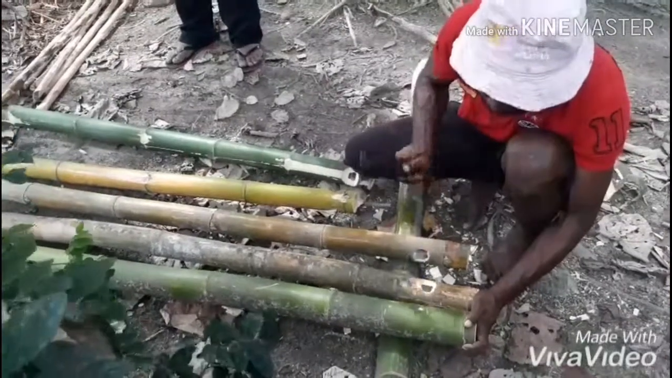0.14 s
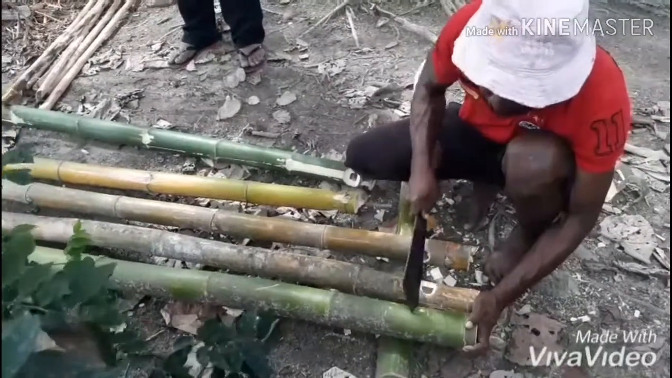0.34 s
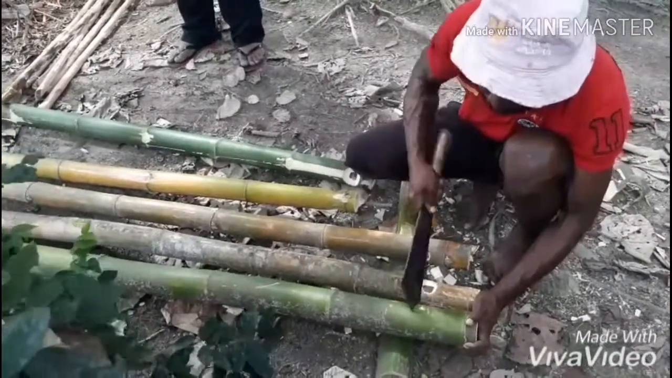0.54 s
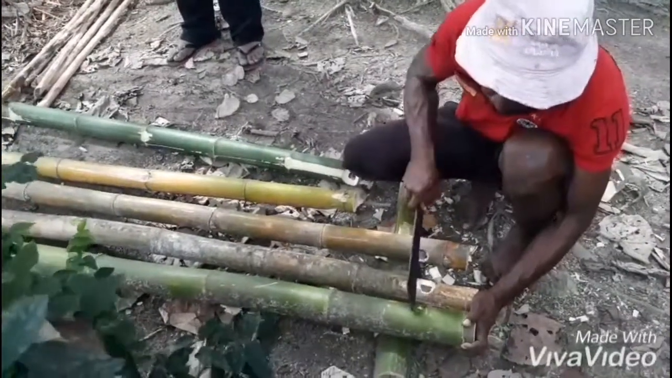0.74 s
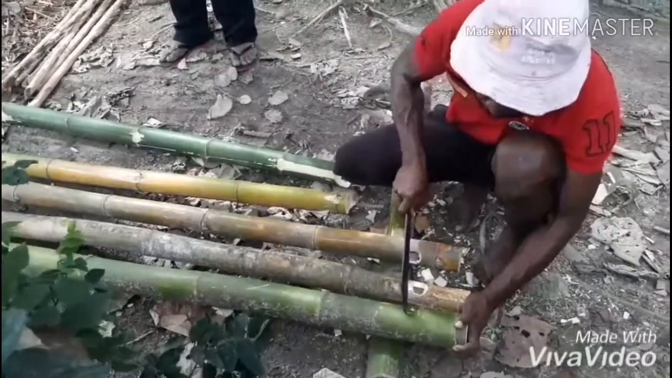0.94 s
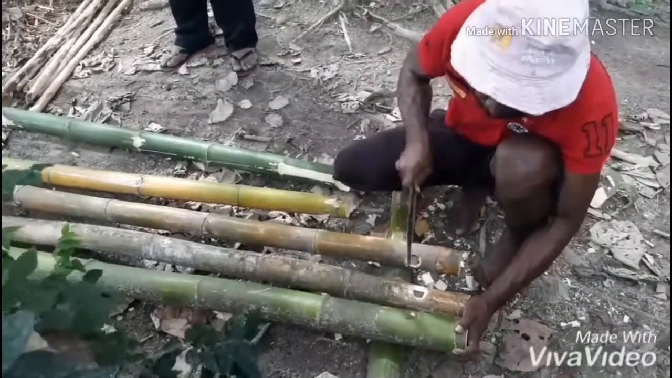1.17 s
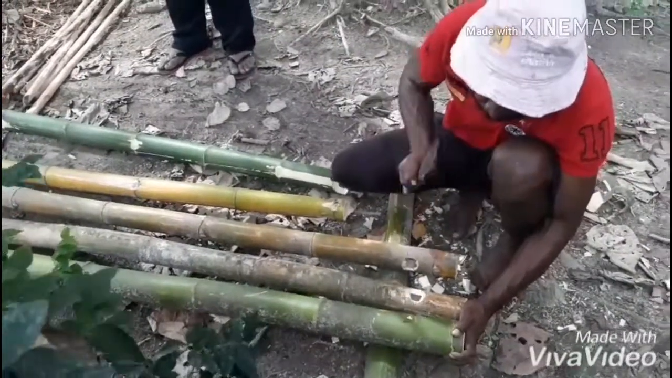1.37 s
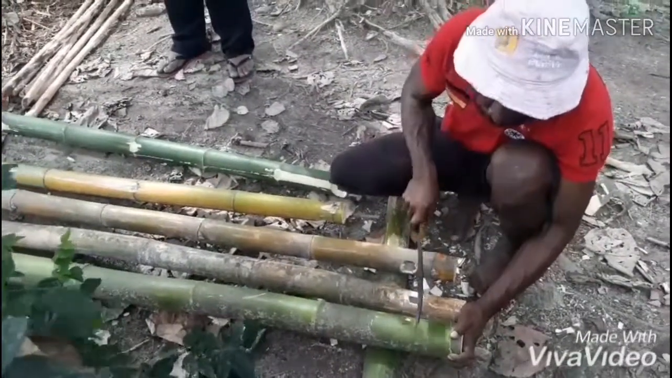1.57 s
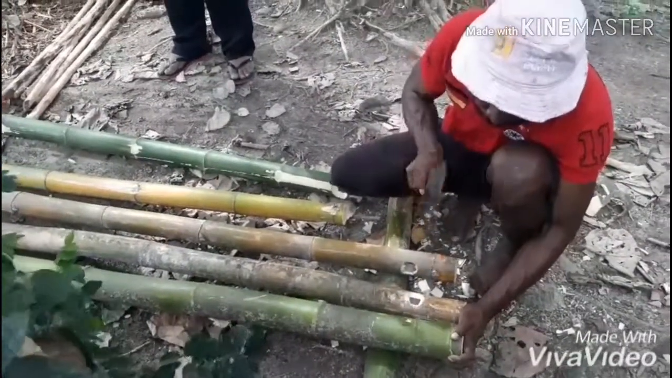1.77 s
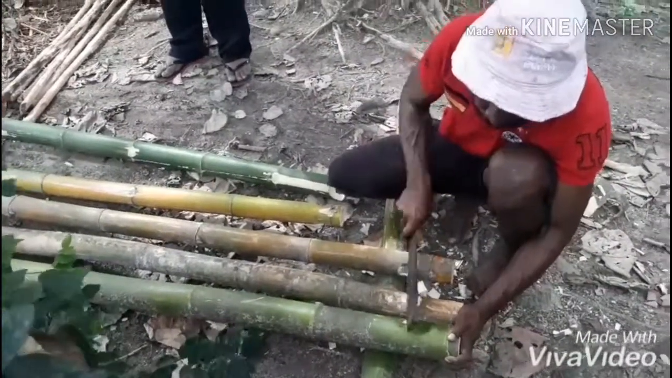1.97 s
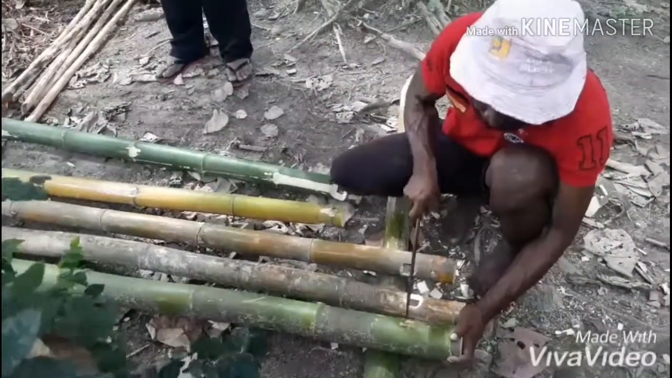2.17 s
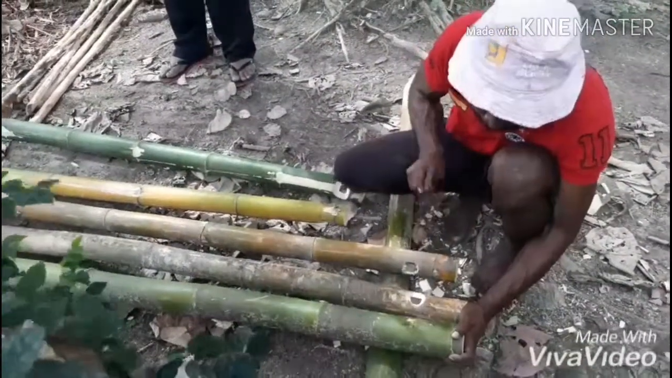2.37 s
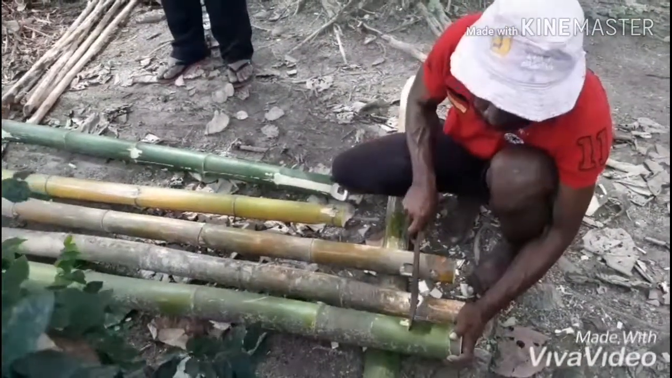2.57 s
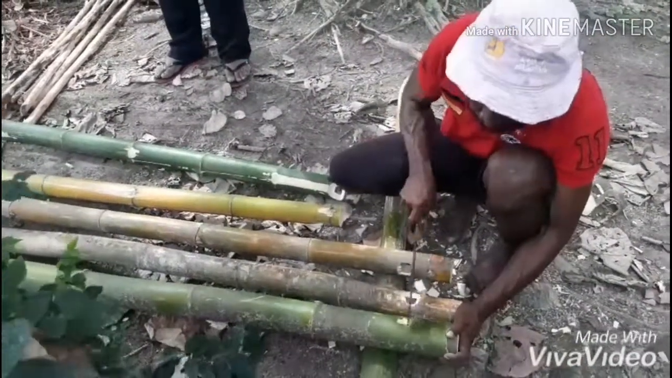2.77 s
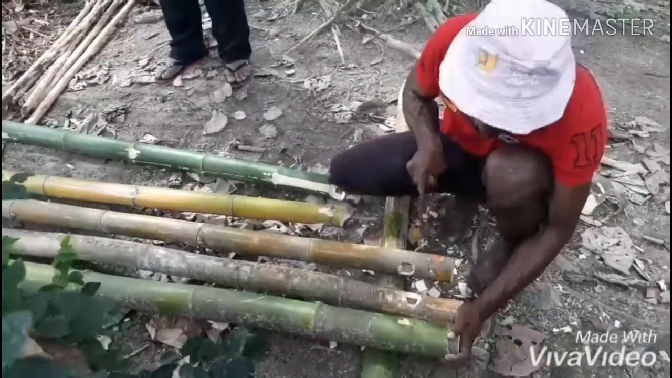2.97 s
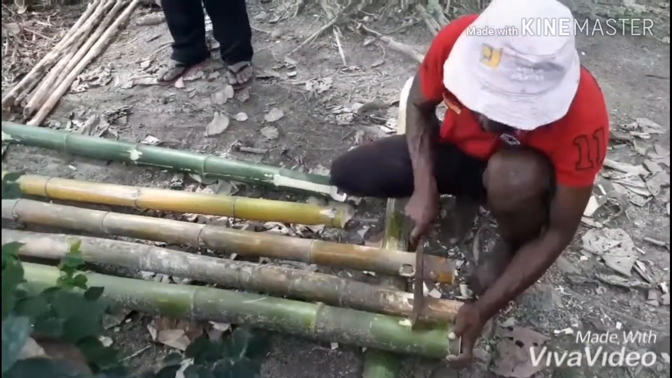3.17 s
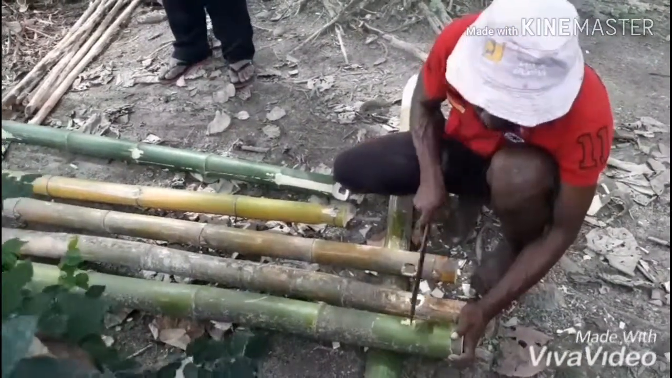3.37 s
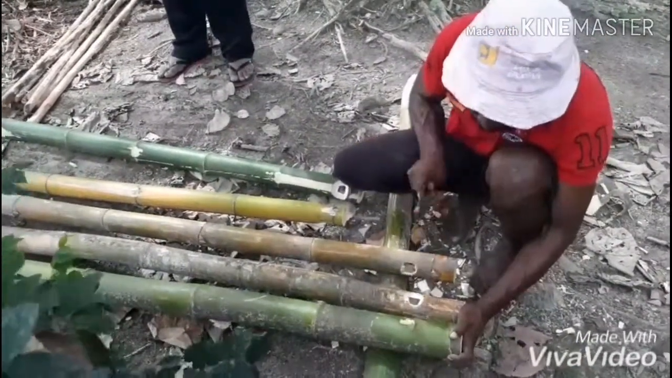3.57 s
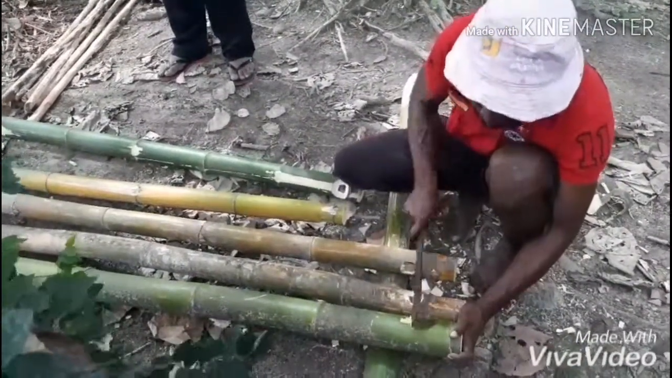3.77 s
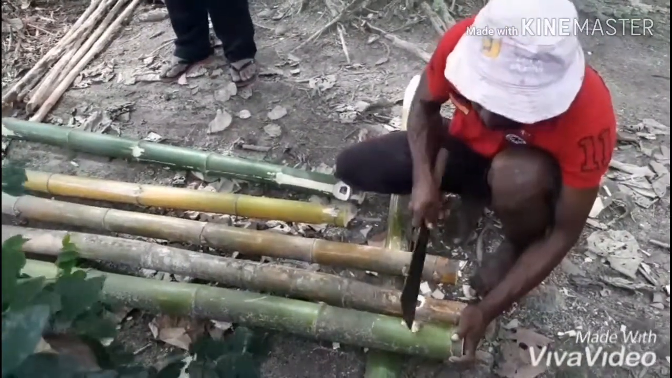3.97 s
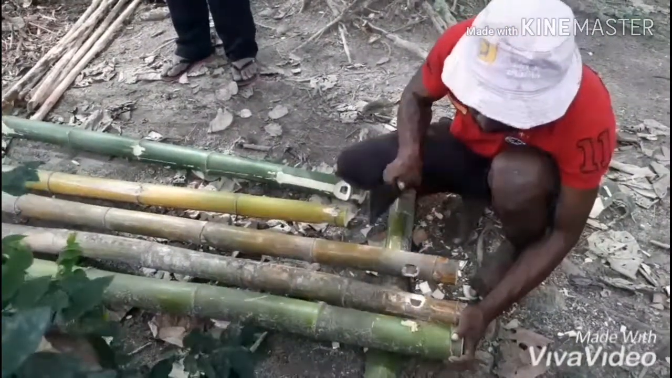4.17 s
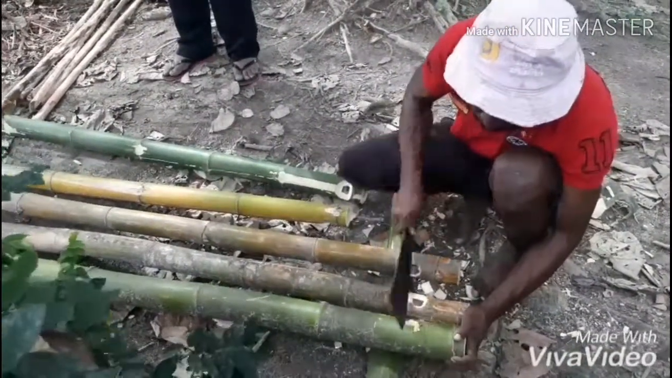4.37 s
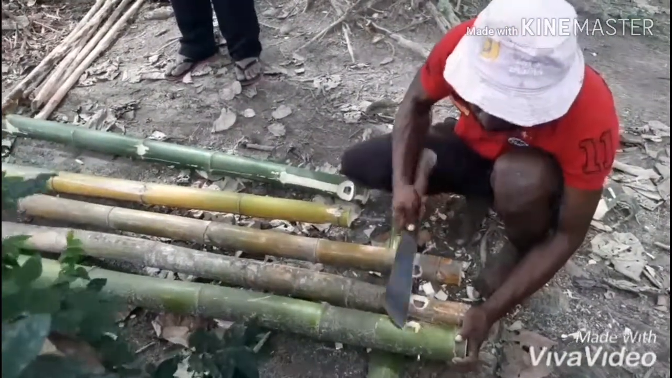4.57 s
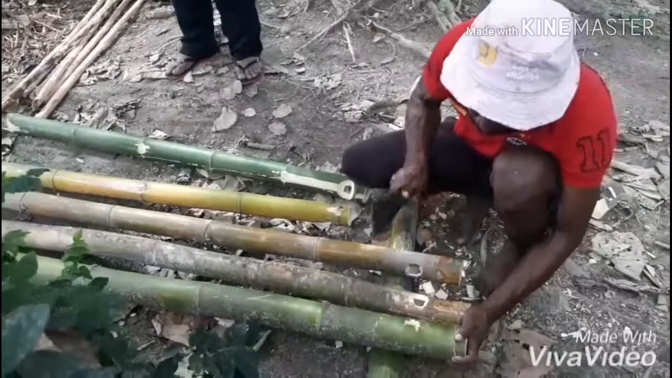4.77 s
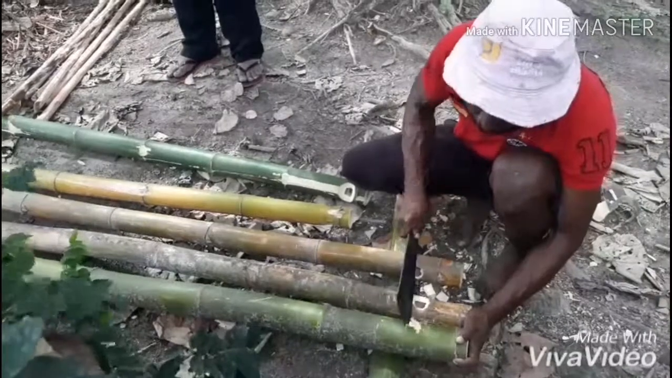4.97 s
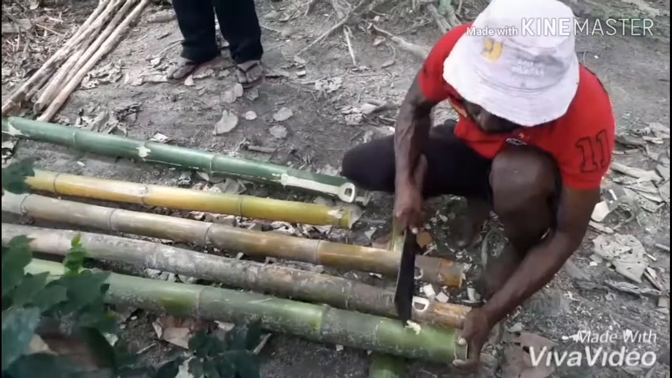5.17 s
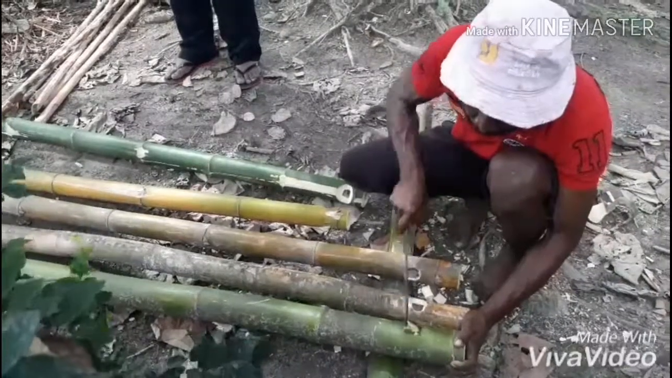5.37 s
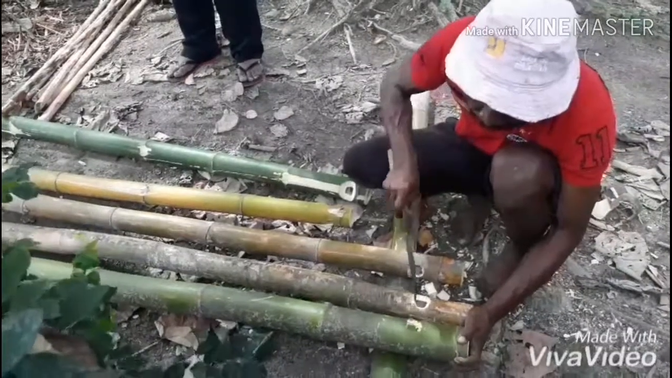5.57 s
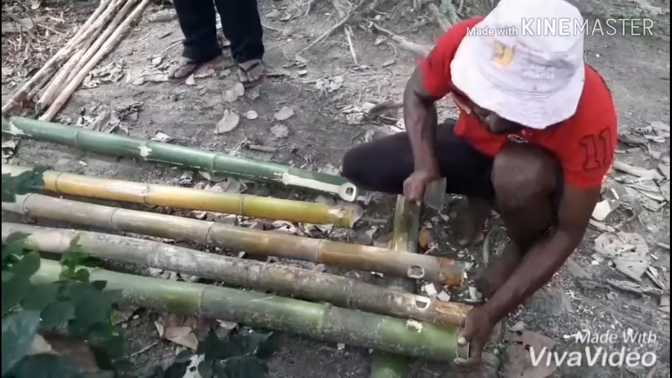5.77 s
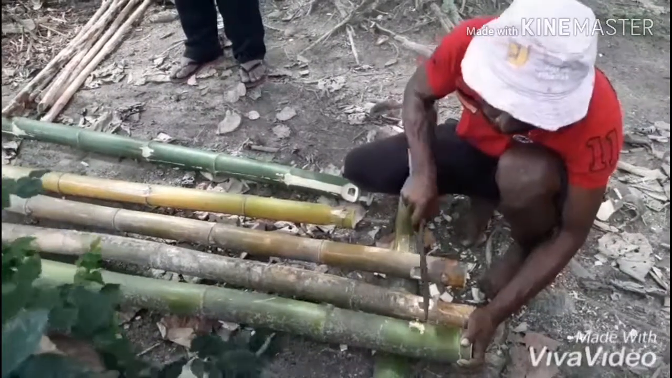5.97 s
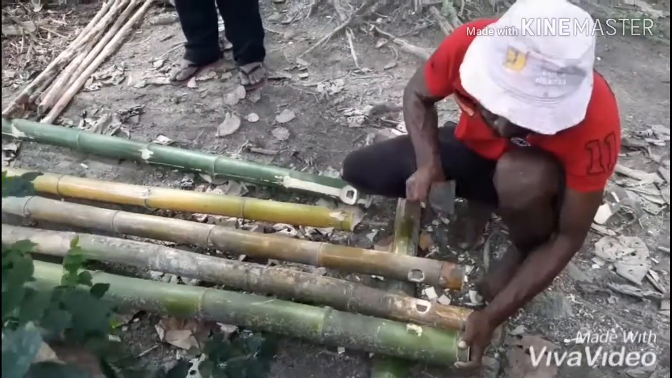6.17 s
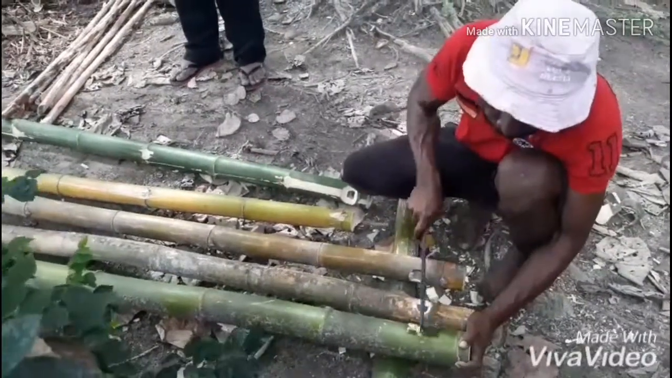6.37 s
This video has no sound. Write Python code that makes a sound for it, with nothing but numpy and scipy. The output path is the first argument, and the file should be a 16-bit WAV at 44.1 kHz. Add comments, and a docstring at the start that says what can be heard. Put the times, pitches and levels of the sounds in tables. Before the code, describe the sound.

A quiet outdoor bed of wavering hiss and low rumble runs throughout. At 0.35 s a machete bites bamboo: a sharp, bright, fibrous crack with a metallic ping, then a hollow mid-pitched knock that flutters back twice within a few hundredths of a second, and a short dry yard tail. Small chips tick and rustle around 0.9 to 1.3 s, with a dull wind thump near 1.1 s. A stronger blow lands at 1.6 s, then others at 2.0, 2.6, 3.3, 3.8, 4.5 and 5.0 s, uneven in force and tone; the one at 3.8 is bright and pinging. A heavier wind bump comes at 2.85 s. Splinters tick at 3.0, 4.1, 4.7 and 5.4 s. A barely heard tap falls at 5.45 s, then full chops at 5.97 and 6.38 s, the last close to the end. Close, mono, phone-like sound.

```python
"""A machete chops a green bamboo pole lying on the ground; wavering outdoor hiss and low rumble run throughout.
Filtered noise makes the hiss; chips tick as grainy bursts and wind puffs thump as clustered impulses between blows.
Eleven blows fall from 0.35 to 6.38 s, mostly about half a second apart after the second; the ninth is faint.
Each blow starts with a crack of noise grains and decaying sines of the whole pole, which outlast the crack.
The hollow pole's sine packets swell and return twice while a scattered noise tail from the yard builds and dies."""
import sys
import numpy as np
from scipy import signal
from scipy.fft import rfft, irfft
from scipy.io import wavfile
from scipy.ndimage import uniform_filter1d

SR = 44100
rng = np.random.default_rng(int(sys.argv[2]) if len(sys.argv) > 2 else 0)


def to_wav(sig):
    """Store sig (one row per channel, or 1-D mono) as 16-bit WAV at the path in sys.argv[1].

    Samples outside -1..1 are clipped; the rate is SR.
    """
    pcm = np.clip(np.atleast_2d(sig), -1, 1) * 32767
    pcm = np.round(pcm).astype(np.int16)
    wavfile.write(sys.argv[1], SR, pcm.T)  # frames by channels


N = 284004
TIME_S = np.arange(N) / SR
AGE_S = np.arange(SR // 2) / SR  # time within one event
TILT_FROM_HZ = 4000  # the treble slope of a blow acts above this

# Resonances of the microphone port. Each row: centre in Hz, width in Hz, height in dB.
PORT = [(5350, 830, 5.5), (8730, 620, 4)]


def undb(db):
    """Decibels to gain."""
    return 10 ** (np.asarray(db) / 20)


def unit(x):
    """Scale to rms 1."""
    return x / np.sqrt(np.mean(x ** 2))


def add(out, start_s, x):
    """Mix x into out from start_s, trimming what falls outside."""
    i = int(start_s * SR)
    x, i = x[max(-i, 0):], max(i, 0)
    out[i:i + len(x)] += x[:len(out) - i]


def colour(x, points, resonances=()):
    """Minimum-phase filter from (Hz, dB) points and (Hz, width Hz, dB) peaks; white noise keeps its level."""
    f_hz = np.fft.rfftfreq(len(x), 1 / SR) + 1
    point_hz, point_db = np.transpose(points)
    curve_db = np.interp(np.log(f_hz), np.log(point_hz), point_db)
    for centre_hz, width_hz, height_db in resonances:
        curve_db = curve_db + height_db / (1 + (2 * (f_hz - centre_hz) / width_hz) ** 2)
    # folding the cepstrum onto positive time makes the filter causal
    cepstrum = irfft(np.log(unit(undb(curve_db))), len(x))
    cepstrum[1:len(x) // 2] *= 2
    cepstrum[len(x) // 2 + 1:] = 0
    return irfft(rfft(x) * np.exp(rfft(cepstrum)), len(x))


def tilted(points, tilt_db_per_oct):
    """Slope the treble of (Hz, dB) points."""
    return [(hz, db + tilt_db_per_oct * np.log2(max(hz / TILT_FROM_HZ, 1))) for hz, db in points]


def fade(t60_s):
    """Exponential decay over one event."""
    return undb(-60 * AGE_S / max(t60_s, 1 / SR))


def grains(spread_db, size=20):
    """Noise whose level jumps at random every size samples."""
    strength = np.repeat(rng.standard_normal(len(AGE_S) // size + 1), size)[:len(AGE_S)]
    return unit(rng.standard_normal(len(AGE_S)) * undb(spread_db * strength))


def walk(rate_hz):
    """Slow random drift of rms near 1."""
    k = int(SR / rate_hz)
    steps = np.repeat(rng.standard_normal(N // k + 1), k)
    return unit(uniform_filter1d(steps, k)[:N])


def scattered(typical_db, typical_size, count, spread_db=-1.0, spread_octaves=0.4):
    """Rows (s, dB, size) of small events, one somewhere in each equal stretch of time."""
    times_s = (np.arange(count) + rng.random(count)) * N / SR / count
    draws = rng.standard_normal((count, 2))
    return [(s, typical_db + spread_db * a, typical_size * 2 ** (spread_octaves * b))
            for s, (a, b) in zip(times_s, draws)]


def chops():
    """Each blow's strength drives crack, knock, ring and yard; its row also weights the knock's modes."""
    # Each row: start in seconds, strength in dB, hollow note in dB, middle wall mode in dB,
    # upper wall modes in dB, treble slope in dB per octave, blade ping in dB.
    blows = [(0.348, -0.5, -14.5, -16, -14, 1, 19), (1.582, 3.5, -17.5, -17.5, -14.5, 0, 11.5),
             (2.039, -2, -10.5, -13, -20.5, -1, 10.5), (2.594, -2.5, -10.5, -24, -17, 1.5, 13.5),
             (3.267, 1.5, -13.5, -19.5, -13.5, -0.5, 9), (3.844, -4.5, -9.5, -6.5, -23.5, 5, 20),
             (4.484, 2, -12, -14.5, -16.5, -1.5, 5), (5.039, -5.5, -24, -14.5, -12.5, -0.5, 5),
             (5.448, -20, -33, -18, -12, 1.5, 5), (5.965, -1, -15, -19, -21.5, 5, 14),
             (6.38, 2, -16.5, -15.5, -14, -1, 10)]
    crack_db, yard_db = -12.5, -8.5
    linger_db, linger_growth_db_per_db = 1, 0.3  # hard blows ring on more than in proportion
    out = np.zeros(N)
    for start_s, strength_db, hollow_db, middle_db, upper_db, tilt_db_per_oct, ping_db in blows:
        split = undb(crack_db) * crack(tilt_db_per_oct, ping_db)
        knock = pole((hollow_db, middle_db, upper_db, upper_db))
        ring = undb(linger_db + linger_growth_db_per_db * strength_db) * bending()
        answer = undb(yard_db) * yard(tilt_db_per_oct)
        add(out, start_s, undb(strength_db) * (split + knock + ring + answer))
    return out


def crack(tilt_db_per_oct, ping_db, split_s=0.0048, first_share=1.07):
    """Fibres snap densely, ever harder while the edge sinks in, then crackle as it comes to rest."""
    # Spectrum of splitting fibres. Each row: frequency in Hz, level in dB.
    fibres = [(40, -31.5), (130, -7), (300, 1), (650, -2), (1400, 5), (2100, 5.5), (3300, 3), (4100, -4.5),
              (6000, -2), (8800, -6.5), (9700, -13), (12500, -14), (16000, -30)]
    # Ring of the blade as it bites. Each row: centre in Hz, width in Hz, height in dB.
    blade = [(2780, 330, 5.5), (3580, 170, 5), (5670, 200, 7), (7010, 400, 6.5), (8680, 480, 5.5)]
    ping_hz, ping_width_hz = 4730, 460
    depth = AGE_S / split_s
    bite = (first_share + depth / 2) * np.exp(-depth ** 6)
    snaps = grains(spread_db=3.0) * bite
    crackle = undb(-4.5) * grains(spread_db=4.5) * fade(t60_s=0.098)
    resonances = list(blade) + [(ping_hz, ping_width_hz, ping_db)]
    return colour(snaps + crackle, tilted(fibres, tilt_db_per_oct), resonances)


def pole(levels_db, detune=0.0026):
    """Each mode swells and dies in a few cycles, then returns twice from along the tube."""
    # Modes of the pole. Each row: nominal frequency in Hz, level in dB, delay in seconds, swell time in
    # seconds (peak at twice this), round trip in seconds, first and second return in dB.
    modes = [(854.3, 2.5, 0.00362, 0.0021, .0190, 1, -12), (1257, 2, 0.00455, 0.0026, .0146, -10, -17),
             (1968, 4, 0.001543, 0.0024, 0.014, -10.5, -25.5), (2125, 0.5, .0014, 0.0026, 0.016, -19, -29)]
    out = 0
    for (hz, db, delay_s, swell_s, trip_s, first_db, second_db), blow_db in zip(modes, levels_db):
        hz = hz * (1 + detune * rng.standard_normal())  # small random detune of each mode per blow
        for k, return_db in enumerate((0, first_db, second_db)):
            t_s = np.maximum(AGE_S - delay_s - k * trip_s, 0)
            packet = (t_s / (2 * swell_s)) ** 2 * np.exp(2 - t_s / swell_s)
            out = out + undb(blow_db + db + return_db) * packet * np.sin(2 * np.pi * hz * t_s)
    return out


def bending(scatter_db=1.5):
    """The whole pole rings on in decaying sines; mode levels and signs vary at random from blow to blow."""
    # Lingering modes, slow bending upward. Each row: frequency in Hz, typical level in dB, t60 in seconds.
    modes = [(119, -41.5, 0.38), (260, -31.5, 0.051), (354, -36.5, 0.17), (395.3, -33, 0.34),
             (439, -29.5, 0.21), (786, -29.5, 0.23), (841, -34.5, 0.31), (860, -44, 0.62), (887, -31, 0.18),
             (1016, -23.5, 0.082), (1202, -24.5, .2), (1261, -26.5, 0.094), (1550, -25, 0.1),
             (1680, -33.5, 0.082), (1766, -32.5, 0.18), (1956, -30, 0.21), (2275, -29, 0.098),
             (2702, -27.5, 0.11), (2965, -31, 0.11), (3495, -26.5, 0.055), (4613, -26, 0.036),
             (5790, -27, 0.046)]
    gains = undb(scatter_db * rng.standard_normal(len(modes)))
    signs = np.sign(rng.standard_normal(len(modes)))
    out = 0
    for (hz, db, t60_s), share in zip(modes, gains * signs):
        out = out + share * undb(db) * fade(t60_s) * np.sin(2 * np.pi * hz * AGE_S)
    return out


def yard(tilt_db_per_oct, build_s=0.018):
    """Ground and nearby things scatter the blow: a short tail, uneven in colour, and a faint longer one."""
    # Spectrum of the scattered sound. Each row: frequency in Hz, level in dB.
    spectrum = [(59, -25), (100, -10.5), (283, -1.5), (398, 0), (621, -7), (854, -0.5), (1010, -3),
                (1420, -6), (1910, -3), (2630, -5.5), (3540, -15), (5530, -18), (8640, -27.5),
                (13200, -38.5), (16000, -47.5)]
    decay = undb(-6.5) * fade(t60_s=0.26) + undb(-36.0) * fade(t60_s=0.72)
    tail = decay * (1 - np.exp(-AGE_S / build_s))
    patches = [(hz, hz / 20, 2.2 * rng.standard_normal()) for hz in np.geomspace(900, 13000, 44)]
    return colour(grains(spread_db=2.5) * tail, tilted(spectrum, tilt_db_per_oct), list(PORT) + patches)


def chips():
    """Dry splinters land and snap, the blade scrapes free of a cut, and a light knock sounds: short grainy
    rustles over a decaying envelope."""
    # The clearest chips and twigs, with one long scrape of the blade (1.186 s) and a light knock on the pole
    # (5.667 s). Each row: start in seconds, level in dB, centre in Hz, t60 in seconds.
    clear = [(0.882, -41, 2550, 0.016), (1.186, -32, 2500, 0.12), (1.279, -35, 2750, 0.019),
             (3.042, -35, 2940, 0.03), (3.101, -45.5, 7060, 0.025), (4.133, -35, 4600, 0.022),
             (4.706, -35, 7400, 0.02), (5.353, -37.5, 7440, 0.025), (5.43, -34.5, 6500, 0.066),
             (5.667, -34, 1110, 0.056)]
    litter_db, litter_hz, litter_t60_s = -47, 5000, 0.04  # fainter, at random; typical level and centre
    scrape_s = 0.78  # rise time = t60 squared over this: short ticks snap, long ones swell
    litter = [(s, db, hz, litter_t60_s) for s, db, hz in scattered(litter_db, litter_hz, count=10)]
    out = np.zeros(N)
    for start_s, db, hz, t60_s in list(clear) + litter:
        rise = 1 - np.exp(-AGE_S / (t60_s ** 2 / scrape_s))
        rustle = grains(spread_db=5.5) * rise * fade(t60_s)
        band = [(hz / 8, -18), (hz / 2, -7), (hz, 0), (hz * 2, -14), (hz * 12, -45)]
        add(out, start_s, undb(db) * colour(rustle, band))
    return out


def wind(eddies_per_s=420, core=1.8):
    """Each puff is a cluster of eddies that hit the microphone as dull, uneven thumps."""
    # The strongest puffs. Each row: centre in seconds, level in dB, half length in seconds.
    strong = [(0.684, -36, 0.006), (0.983, -32, 0.016), (1.064, -27, 0.024), (1.102, -21, 0.012),
              (1.528, -30.5, 0.036), (1.805, -35, 0.012), (1.952, -26.5, 0.017), (2.842, -18.5, 0.012),
              (2.88, -27, 0.0038), (3.655, -36.5, 0.041), (3.975, -34, 0.0086), (4.25, -44, 0.042),
              (4.597, -31, 0.007), (5.916, -33.5, 0.04), (6.111, -37.5, 0.021)]
    breeze_db, breeze_half_s = -48.5, 0.02  # weak puffs at random: typical level and half length
    # a stronger puff has smaller eddies: upper edge at 0 dB, and the rise in level that doubles it
    full_edge_hz, edge_doubling_db = 329, 48.5
    middle = len(AGE_S) // 2
    middle_s = AGE_S[middle]
    out = np.zeros(N)
    for centre_s, db, half_s in list(strong) + scattered(breeze_db, breeze_half_s, count=10):
        edge_hz = full_edge_hz * 2 ** (db / edge_doubling_db)
        eddies = rng.standard_normal(len(AGE_S)) * (rng.random(len(AGE_S)) < eddies_per_s / SR)
        eddies[middle] = core  # fixed strength for the central eddy
        eddies = eddies * np.exp(-.5 * ((AGE_S - middle_s) / half_s) ** 2)
        band = [(edge_hz / 8, -28), (edge_hz * 0.39, 0), (edge_hz * 0.94, -1),
                (edge_hz * 2, -19), (edge_hz * 4, -44), (8000, -90)]
        puff = unit(colour(eddies, band)) * np.sqrt(half_s / middle_s)  # longer puffs carry more energy
        add(out, centre_s - middle_s - .004, undb(db) * puff)  # eddies centred 4 ms early
    return out


def air():
    """Distant outdoor hiss that wavers, over a restless low rumble of moving air."""
    # Hiss level ahead of the overall gain. Each row: time in seconds, level in dB.
    level_points = [(0.0, -47.5), (0.38, -52.5), (0.63, -54), (0.93, -55), (1.61, -49.5), (2.65, -53.5),
                    (2.96, -54.5), (3.32, -53), (3.5, -59.5), (3.87, -61), (4.0, -56), (4.55, -49),
                    (4.82, -54.5), (6.44, -48)]
    # Hiss spectrum. Each row: frequency in Hz, level in dB.
    spectrum = [(15, -34), (25, -5.5), (97, 2.5), (185, -4), (394, -9.5), (560, -15.5), (988, -12.5),
                (2410, -8.5), (3430, -19.5), (5430, -23.5), (7710, -26), (8830, -29.5), (10700, -34),
                (14800, -39.5), (16000, -39.5)]
    gain_db = 3.5
    level_db = gain_db + np.interp(TIME_S, *np.transpose(level_points))
    hiss = colour(rng.standard_normal(N), spectrum, PORT) * undb(level_db + .5 * walk(10))
    restless = rng.standard_normal(N) * undb(3 * walk(12))
    rumble = colour(restless, [(25, -28), (90, 0), (200, -3), (500, -25), (2000, -70)])
    return hiss + undb(-67) * rumble


def scene():
    """One channel: the chopping and its surroundings."""
    return (chops() + chips() + wind() + air())[None]


def record(dry):
    """The phone thins the deep bass, rounds off the loudest peaks and cuts the top."""
    bass_hz, ceiling, top_hz = 45, .95, 15800
    thin = signal.sosfilt(signal.butter(3, bass_hz, "high", fs=SR, output="sos"), dry)
    rounded = thin / (1 + (thin / ceiling) ** 4) ** (1 / 4)
    return signal.sosfilt(signal.ellip(8, .2, 70, top_hz, fs=SR, output="sos"), rounded)


dry = scene()
out = record(dry)
to_wav(out)
```